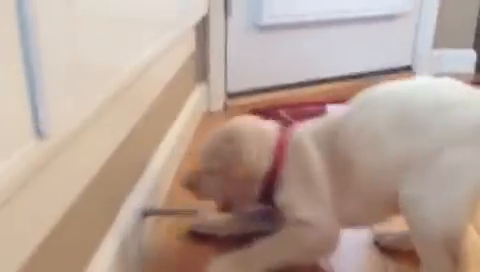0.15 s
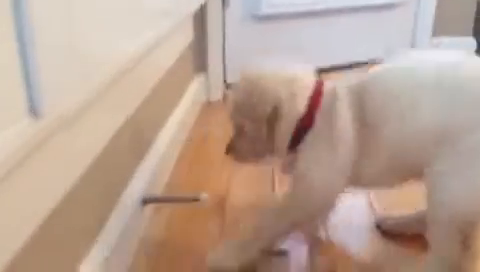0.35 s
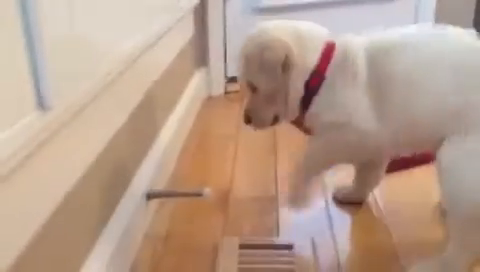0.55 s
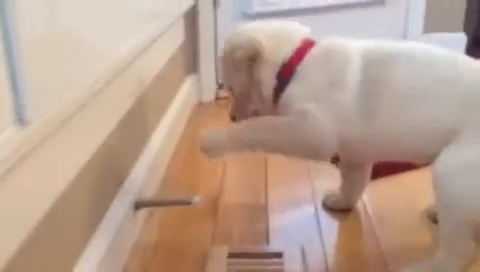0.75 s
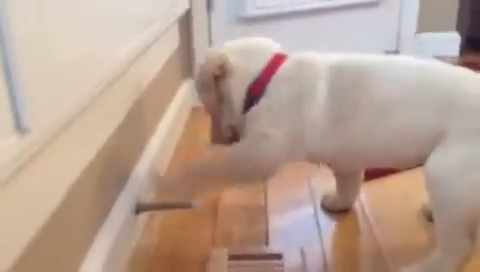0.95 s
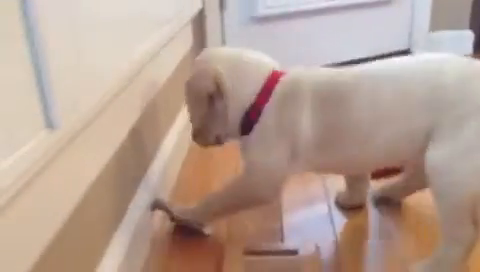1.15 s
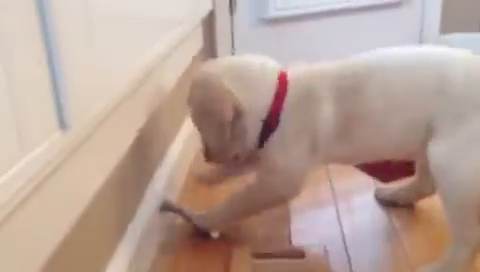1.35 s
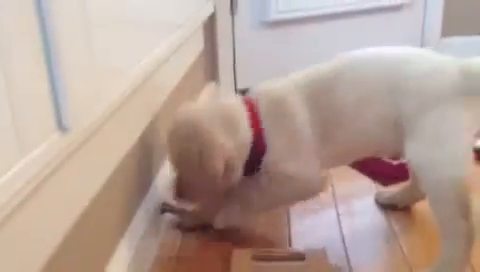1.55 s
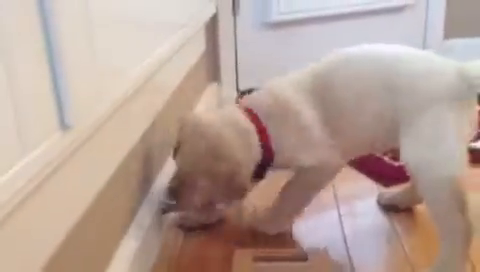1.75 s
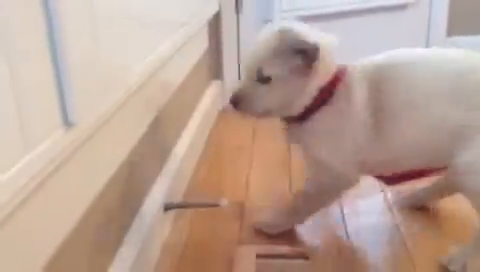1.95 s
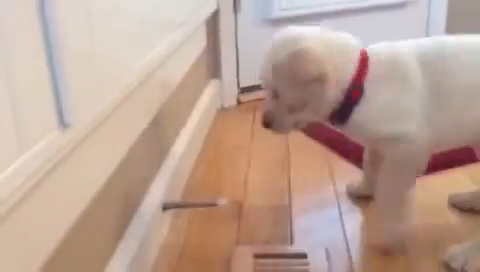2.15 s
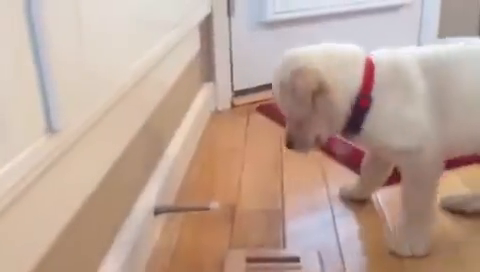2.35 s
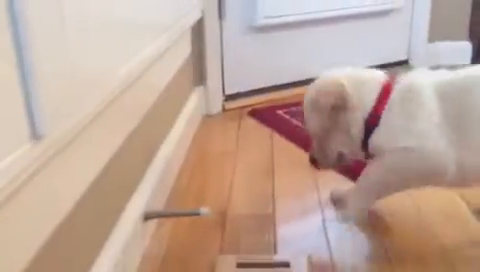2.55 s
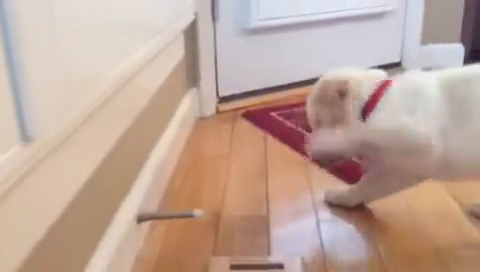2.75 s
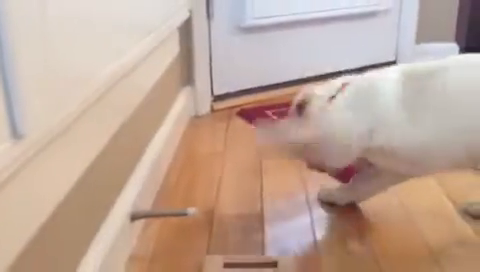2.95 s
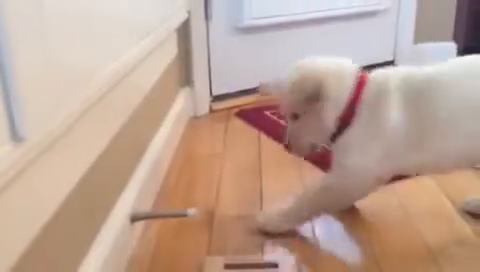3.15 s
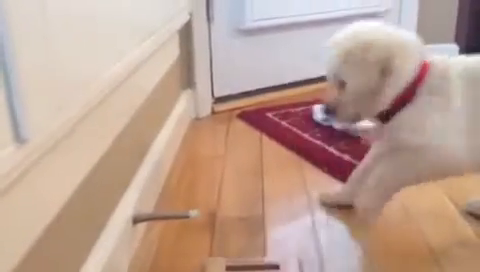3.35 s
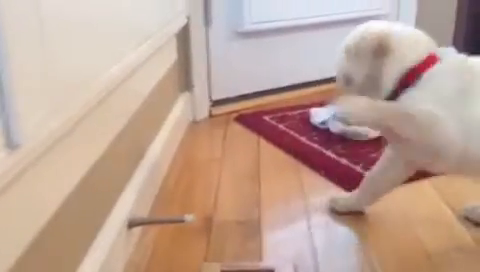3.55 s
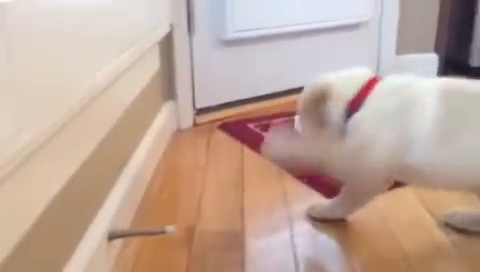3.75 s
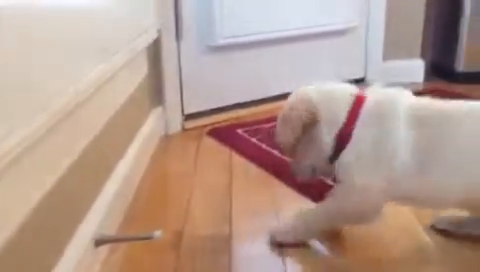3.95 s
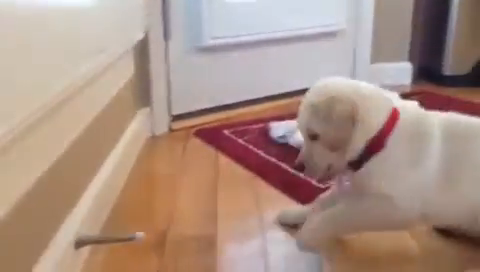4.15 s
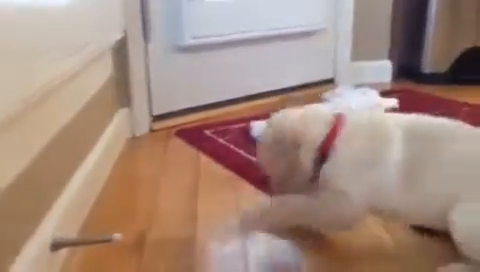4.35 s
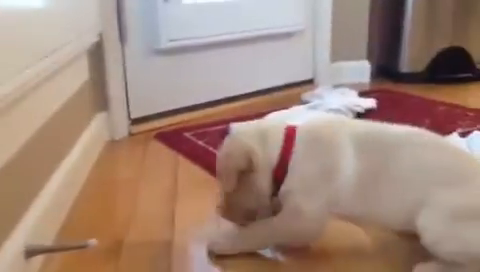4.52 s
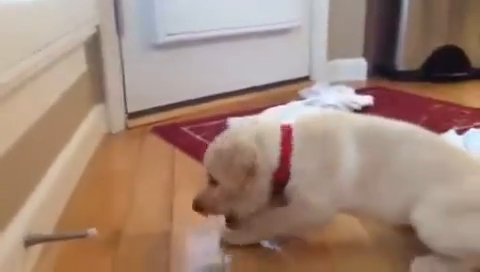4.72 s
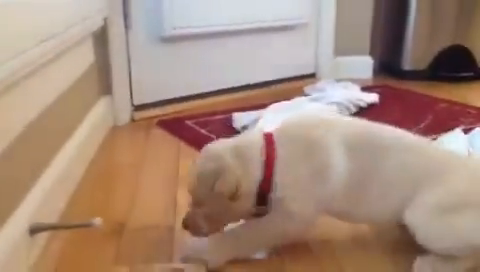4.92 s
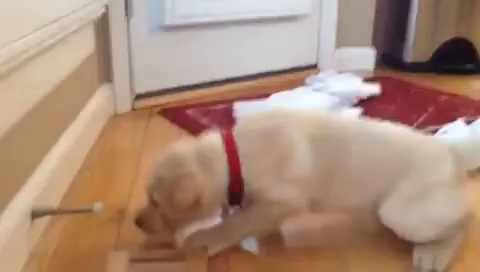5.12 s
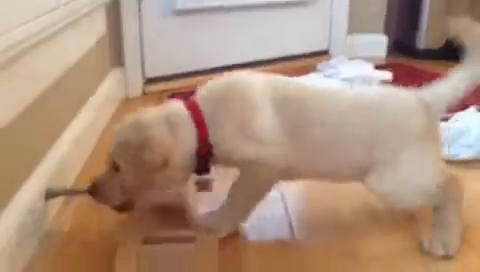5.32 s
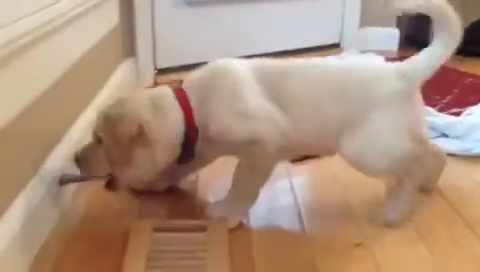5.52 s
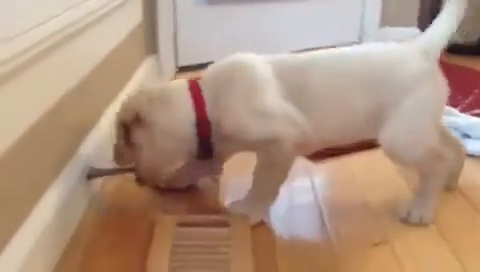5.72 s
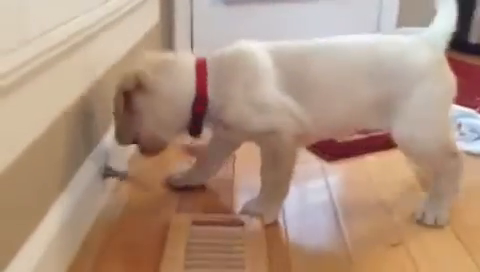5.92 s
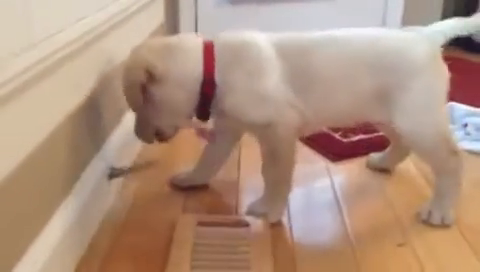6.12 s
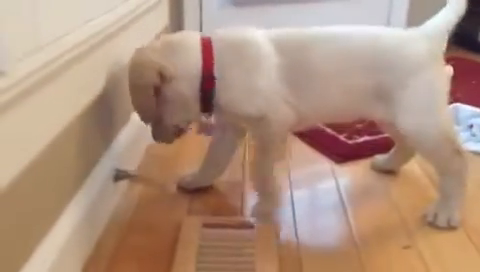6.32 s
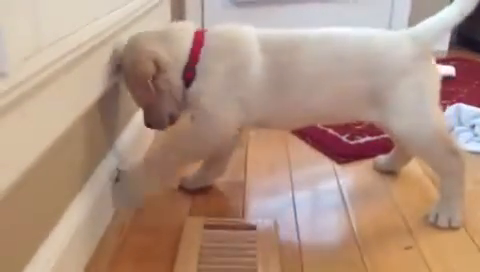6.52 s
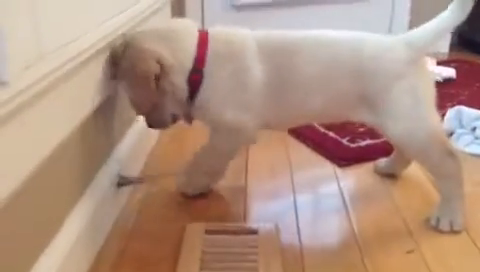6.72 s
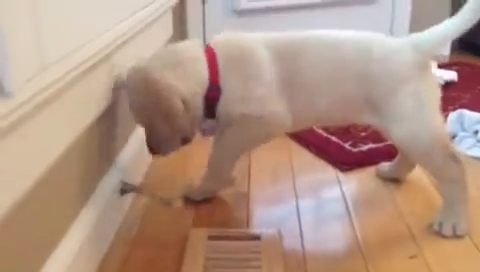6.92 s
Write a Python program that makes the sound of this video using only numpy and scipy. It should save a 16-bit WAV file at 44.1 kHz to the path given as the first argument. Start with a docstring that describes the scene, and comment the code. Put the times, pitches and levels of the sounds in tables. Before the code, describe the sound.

A puppy's paw slaps a coil-spring door stopper with a hard hollow knock, then later sets it clattering in a fast metallic, woody rattle.

```python
"""A paw lands, a floor vent clacks and a coil-spring door stopper flutters lightly over an appliance's hum.
A puppy in a small hall with a wooden floor then slaps the stopper down, bites it and sets it swinging:
the coils clap shut at each turn and shake the skirting board. Paws thud, claws tick and scuff, a tag jingles.
Impacts are sums of damped resonances, friction is granular noise, dispersion smears the metallic blows,
and the hum is a set of wavering sines over coloured noise; echoes and a decaying tail form the hall."""
import sys
import numpy as np
from scipy import signal
from scipy.fft import rfft, irfft
from scipy.io import wavfile
from scipy.ndimage import uniform_filter1d

SR = 44100
rng = np.random.default_rng(int(sys.argv[2]) if len(sys.argv) > 2 else 0)


def transcribe(u):
    """Save the signal u as a 16-bit wav file named by the first command-line argument.

    u: samples, shape (n,) or (channels, n), limited to [-1, 1]; the rate is SR.
    q: integer samples, one column per channel.
    """
    v = np.clip(np.atleast_2d(u).T, -1, 1)
    q = np.round(v * 32767).astype(np.int16)
    wavfile.write(sys.argv[1], SR, q)


N = 307818

# In all tables of resonances and spectra, levels are relative: the responses are normalised afterwards.
# Coil claps, a flutter, a bite and two swings: [t/s, coil level/dB, mounting cup level/dB, board level/dB,
# wire boom level/dB, coil brightness/(dB/octave), initial twang f/Hz, twang level/dB]
CLAPS = [(0.003, -49, -52, -42, -34, 3, 1010, -52), (0.1106, -48.5, -50, -49, -41, 2.5, 1030, -54),
         (0.2375, -45.5, -55, -35.5, -55, -10, 2370, -53), (0.2604, -49, -51, -57, -61, 2, 3060, -54),
         (0.2905, -45, -48, -36.5, -55, -22, 2360, -42), (0.3056, -47.5, -58, -39.5, -52, 2, 3200, -48),
         (0.331, -47, -51, -55, -50, -7, 3250, -44), (0.37, -55, -61, -48, -56, -7, 1220, -60),
         (0.392, -55, -60, -48, -58, 0, 3100, -58), (0.412, -58, -60, -48.5, -57.5, -2, 3000, -61),
         (0.4572, -53, -52, -43, -60, -10, 880, -51), (1.6936, -28.5, -30.5, -38, -28, -1.5, 1530, -37),
         (1.7037, -43, -27.5, -31.5, -36.5, -6, 902, -29), (1.7142, -31, -35, -28.5, -31, -4, 863, -36),
         (1.7452, -36, -33.5, -28.5, -29, -6, 890, -36), (1.7662, -40, -46, -35, -30, -5, 3320, -39),
         (1.789, -51, -50, -38, -46, -4, 900, -50), (5.984, -24.5, -22, -34.5, -25, -7.5, 1823, -23.5),
         (6.0278, -28, -22, -21.5, -25, -1.5, 1062, -27.5), (6.0677, -26, -30, -23, -27.5, -6, 1790, -30.5),
         (6.1097, -24, -30.5, -25.5, -25, -3, 3060, -36), (6.1485, -28, -30.5, -26, -23.5, -2, 3000, -31),
         (6.1908, -22.5, -31, -24, -29, -4.5, 2360, -24.5),
         (6.2286, -28.5, -30, -24.5, -24.5, -5, 1730, -36), (6.2709, -26, -29.5, -22.5, -29, -3, 2070, -31),
         (6.3066, -26.5, -29.5, -23, -25.5, -3.5, 877, -27.5),
         (6.3475, -22.5, -24.5, -20, -27, -2.5, 1140, -31), (6.3836, -22.5, -29, -23, -32, -3.5, 3350, -28),
         (6.4237, -27, -30.5, -25.5, -28.5, -3.5, 1180, -31),
         (6.4593, -25, -29, -24, -27, -3.5, 896, -27.5), (6.4988, -23, -25.5, -23, -27, -3, 1185, -30),
         (6.5326, -32.5, -42, -34.5, -39, -4, 1820, -32.5), (6.5731, -27, -25, -23.5, -34, -1.5, 1380, -33),
         (6.6079, -31.5, -32.5, -42, -52, -9, 2270, -32.5),
         (6.8184, -29, -30, -36, -27.5, -1.5, 877, -34.5),
         (6.8615, -29.5, -32.5, -38, -40, -5.5, 3020, -41), (6.8998, -28.5, -31, -30.5, -25, -1, 1320, -35),
         (6.9434, -25.5, -32.5, -40, -31, -1.5, 2370, -31)]
# Resonances colouring the coil claps: [f/Hz, width/Hz, level/dB]
COIL_RESONANCES = [(2012, 105, -6.5), (2547, 98, 0), (2815, 170, 2.5), (2970, 140, 4), (3230, 230, -3),
                   (3720, 320, -2.5), (4220, 133, -4), (4930, 290, -5.5), (5670, 270, -11.5),
                   (6130, 740, -17.5), (7470, 270, -12), (8550, 160, -14.5), (10800, 8400, -25.5),
                   (14300, 500, -31)]
# Modes of the mounting cup: [f/Hz, width/Hz, level/dB]
CUP_MODES = [(806, 65, -2), (1035, 25, 1.5), (1356, 74, 4.5), (1740, 144, 3), (1734, 204, 0.5)]
# Modes of the skirting board: [f/Hz, width/Hz, level/dB]
BOARD_MODES = [(146.2, 23, -1), (179.4, 56, -4.5), (255, 34, 0.5), (461, 34, -2), (645, 79, 2.5),
               (698, 45, -3)]
# Modes of the boom excited through the wire: [f/Hz, width/Hz, level/dB]
WIRE_MODES = [(179.5, 23, -6), (242, 19, -1), (298.4, 17, -3), (399.7, 49, 5), (428, 26, -1.5)]
# Spectrum of coils rubbing together: [f/Hz, level/dB]
RUB_COLOUR = [(40, -9), (95, -15), (140, 9), (420, 9), (800, 7), (1400, -1), (2200, -8), (2900, -6),
              (3400, -10), (4200, -5.5), (4700, -17), (6500, -19.5), (15000, -29)]
# The slap of the paw on the stopper: [t/s, level/dB, level sent to the reverberation/dB]
SLAP = (1.1145, -6.5, -17)
# Spectrum of the slap's knock: [f/Hz, level/dB]
SLAP_COLOUR = [(60, -58.5), (140, -14), (250, -10.5), (400, -25.5), (620, -7), (900, -6), (1200, 1.5),
               (1800, -3), (2150, -16), (2600, -25.5), (4000, -23), (6200, -31), (7500, -45.5),
               (15000, -61)]
# Spectrum of coils crushed under the paw: [f/Hz, level/dB]
CRUNCH_COLOUR = [(1000, -10), (2400, -1.5), (3600, 2.5), (6200, -10), (7500, -17.5), (15000, -32.5)]
# Spectrum of the pinned coils shivering: [f/Hz, level/dB]
SHIVER_COLOUR = [(400, -19), (900, -3), (1400, 2.5), (2200, 0), (2700, -10), (5000, -24.5), (8000, -39.5),
                 (15000, -55)]
# Modes of the stopper ringing on after the slap: [f/Hz, width/Hz, level/dB]
SLAP_MODES = [(652, 9, -6.5), (840, 14, -5), (1010, 11, -3), (1146, 6.3, -5), (1250, 9, 0), (1341, 6.1, 2),
              (1373, 3.7, -3), (1506, 7.1, -2), (1713, 6.6, -7), (1790, 4.4, -8.5), (1901, 6.8, -7),
              (1986, 9, 1.5), (2070, 4, -9), (2120, 5.2, -11), (2230, 7, -7), (2299, 3.6, -11.5)]
# Footfalls: [pad t/s, relative pad level/dB, pad brightness/(dB/octave), relative claw level/dB]
STEPS = [(0.001, -36.5, 1, -42), (0.026, -37.5, 4, -66), (0.496, -44, 0.5, -61), (0.545, -43, -3, -65),
         (0.638, -43.5, -3, -50.5), (1.75, -36.5, 5.5, -58), (1.969, -50.5, 4.5, -59),
         (2.103, -42.5, 2, -40), (2.447, -45, 2.5, -53.5), (3.132, -29.5, 1, -30.5),
         (3.9414, -29, -2, -37.5), (4.507, -44, -6.5, -46), (4.75, -45.5, 2, -42.5),
         (5.671, -45.5, 1.5, -71.5), (5.965, -33, 1, -48)]
# Claws alone tapping the wood: [t/s, relative level/dB, brightness/(dB/octave)]
TAPS = [(0.351, -58, 3), (0.505, -50, 1), (1.081, -42, -6), (1.267, -45, -5), (1.288, -52, -5),
        (1.349, -52, 0), (1.518, -46, -6), (1.833, -46, -4), (1.839, -43, -2), (2.303, -38.5, 0.5),
        (3.137, -33, 2), (3.164, -38.5, 2.5), (3.2775, -44.5, 0), (3.3446, -44.5, 3.5), (4.7041, -42.5, 5),
        (4.9041, -49, 3), (4.9903, -40, 4), (5.4447, -47.5, -2.5), (5.864, -46.5, -9), (5.903, -51.5, -11)]
# Modes of the floorboards: [f/Hz, width/Hz, level/dB]
FLOOR_MODES = [(129, 44, -5.5), (164, 25.6, 3.5), (248, 78, -15.5), (325.7, 23, -5), (476, 25, -38),
               (592, 39, -24.5), (819, 45, -16)]
# Resonances colouring the claw ticks: [f/Hz, width/Hz, level/dB]
CLAW_RESONANCES = [(417, 180, -5.5), (850, 100, 0), (1236, 390, -3), (1720, 147, 2), (2130, 310, -0.5),
                   (2925, 330, 3.5), (3670, 370, -1), (4335, 390, 0.5), (5100, 400, -7.5), (5760, 300, -10),
                   (7000, 1000, -12.5), (10990, 5550, -20.5)]
# Pads and fur sliding on the floor: [t/s, length/s, relative level/dB, brightness/(dB/octave)]
SCUFFS = [(0.0, 0.04, -43.5, -3), (0.08, 0.08, -63.5, -10.5), (0.246, 0.44, -56, -2),
          (0.483, 0.046, -47.5, -1), (1.694, 0.12, -48.5, 0), (1.867, 0.56, -60.5, 1),
          (3.263, 0.095, -54, 1.5), (4.102, 0.075, -60.5, 4.5), (4.691, 0.1, -55, 2),
          (4.979, 0.056, -54, 1), (5.568, 0.44, -64, -1.5)]
# Spectrum of the sliding friction: [f/Hz, level/dB]
SCUFF_COLOUR = [(50, -32), (120, -4), (250, 5), (500, 1.5), (900, -1.5), (1300, -8), (3000, -7),
                (5000, -10.5), (7000, -22.5), (15000, -39)]
# A claw dragged over the boards: [t/s, length/s, level/dB]
SCRAPES = [(2.092, 0.013, -63), (3.28, 0.097, -58.5)]
# Resonances colouring the dragged claw: [f/Hz, width/Hz, level/dB]
SCRAPE_RESONANCES = [(2360, 300, -1), (2970, 300, 4), (4290, 860, 4), (5160, 410, -18)]
# Collar tag striking its ring: [t/s, level/dB, brightness/(dB/octave)]
JINGLES = [(1.428, -59.5, 4), (1.4531, -55, -1), (2.026, -40.5, 2), (2.0453, -54, 9), (2.057, -46, 3),
           (2.0776, -43.5, -6), (2.128, -44, -5), (2.175, -49, 9), (2.19, -49, 4), (2.251, -34, -1),
           (2.259, -46, 0)]
# Modes of the tag: [f/Hz, width/Hz, level/dB]
TAG_MODES = [(5250, 74, -13), (6700, 34, 1), (6850, 30, -2), (6900, 47, -6), (8050, 45, -2), (8230, 26, 0),
             (8440, 56, -14), (11000, 250, -15), (12400, 100, -6.5), (14453, 60, -7), (14700, 70, -5)]
# Spectrum of the tag's tick: [f/Hz, level/dB]
TICK_COLOUR = [(1000, -26.5), (4500, -18.0), (7200, 2), (9500, -16.0), (12500, -14), (15000, -9)]
# A paw knocking the grille of a floor vent: [t/s, level/dB]
VENT_KNOCKS = [(0.012, -41), (0.489, -40), (4.974, -48)]
# Modes of the grille: [f/Hz, width/Hz, level/dB]
VENT_MODES = [(848, 37, 10), (910, 40, 0.5), (1175, 44, -4), (1340, 36, -11.5), (2670, 110, -21),
              (3624, 50, -14)]
# Appliance tones, about which pitch and level waver: [f/Hz, rms level/dB]
HUM = [(153, -73), (172.3, -61.5), (204.8, -63.5), (236.9, -69.5), (411, -90), (473.7, -81.5), (613.7, -83)]
# Spectral density of the still air: [f/Hz, level/dB]
AIR = [(18, -70), (30, -42), (65, -28), (102, -19.5), (136, -6.5), (154, -1.5), (171, -6.5), (247, -1),
       (267, -11), (629, -19), (698, -24), (1410, -25), (2190, -28), (13500, -31.5), (15000, -46)]
# Wall and floor echoes: [delay t/s, level/dB]
ECHOES = [(.0033, -19.5), (.0098, -22), (0.0145, -34.5)]
# Reverberation time of the hall: [f/Hz, t60/s]
HALL_T60 = [(150, 0.25), (500, .45), (1500, 0.46), (4000, 0.49), (12000, 0.42)]
# Spectrum of the hall's tail: [f/Hz, level/dB]
HALL_COLOUR = [(150, -1.5), (450, 4.5), (800, 0.5), (1400, -5.5), (2200, -1.5), (2900, -3.5), (4200, -4),
               (6000, -5), (15000, -7)]

WIRE_LAG_S = 0.00891  # the slow bending wave returns along the wire this long after each clap
TWANG_RISE_S, TWANG_DECAY_S, TWANG_FALL_OCT_PER_S = 0.00046, 0.0053, 22.3
RUB_DB, RUB_RISE_S, RUB_DECAY_S = -18.5, 0.015, 0.064  # level relative to the coil level of the clap
SHIVER_DB, SHIVER_PER_S, SHIVER_DECAY_S = -25.5, 500, 0.098  # level relative to the slap
CLAW_LEAD_S, CLAW_BRIGHT_DB = 0.0068, 0.5  # brightness in dB per octave
AIR_DB = -61  # rms
TOP_HZ = 15700
SIZE = 32768  # samples in one response
HZ = np.maximum(np.fft.rfftfreq(SIZE, 1 / SR), 1)
AGE = np.arange(SIZE) / SR  # seconds since contact


def spring():
    """Impact and modal excitation: each clap twangs, rings cup and board, and booms the wire a moment later."""
    out = np.zeros(N)
    travel = bending(lag_s=0.000785)
    panel = radiation(low_hz=123.0, high_hz=1520) * bending(lag_s=0.0003)
    rebound = np.exp(-2j * np.pi * HZ * WIRE_LAG_S)
    # the same turns meet whenever the spring swings to the same side, so alternate claps sound alike
    turns = [chatter(length_s=0.0024) for _ in range(2)]
    for k, (s, coil_db, cup_db, board_db, wire_db, bright, twang_hz, twang_db) in enumerate(CLAPS):
        # each clap weights and detunes the resonances a little at random
        coil = unit(ringing(COIL_RESONANCES, scatter_db=3, detune=.009) * tilt(bright, 3850))
        cup = ringing(CUP_MODES, scatter_db=2.5, detune=.018)
        board = unit(ringing(BOARD_MODES, scatter_db=2.5, detune=.015) * panel)
        wire = unit(ringing(WIRE_MODES, scatter_db=2.5, detune=.02) * panel)
        contact = amp(-1.5) * travel + amp(-8) * turns[k % 2] + amp(-8) * chatter(length_s=0.003)
        metal = contact * (amp(coil_db) * coil + amp(cup_db) * cup)
        metal = metal + amp(twang_db) * twang(twang_hz)
        wood = amp(board_db) * board + amp(wire_db) * wire * rebound
        add(out, s, metal + wood)
    return out + rubbing(CLAPS)


def twang(hz):
    """Dispersion: where the coils meet sets the free spring's pitch, which falls as slower waves arrive."""
    pitch = hz * 2 ** (-TWANG_FALL_OCT_PER_S * AGE)
    phase = 2 * np.pi * np.cumsum(pitch) / SR
    envelope = (1 - np.exp(-AGE / TWANG_RISE_S)) * np.exp(-AGE / TWANG_DECAY_S)
    return unit(rfft(envelope * np.sin(phase)))


def rubbing(claps):
    """Dry friction: the coils grind just before each clap and go on rubbing as they reopen."""
    t, power = np.arange(N) / SR, 0
    for s, db, *_ in claps:
        rise = np.clip(1 + (t - s) / RUB_RISE_S, 0, 1)
        decay = np.exp(-np.clip((t - s) / RUB_DECAY_S, 0, 20))
        power = power + (amp(db + RUB_DB) * rise * decay) ** 2
    return np.sqrt(power) * grains(RUB_COLOUR, spread_db=4.0, grip_db=6.0)


def slap():
    """Compact impact: one hard, hollow knock under the paw; the coils crunch, rebound, shiver and ring on."""
    out, hit = np.zeros(N), knock(SLAP_COLOUR)
    s, db, _ = SLAP
    add(out, s, amp(db) * hit * bending(lag_s=0.00096))
    add(out, s, amp(db - 21.5) * knock(CRUNCH_COLOUR) * chatter(length_s=0.004))
    add(out, s + 0.0026, amp(db - 15) * hit * chatter(length_s=0.004))  # rebound
    add(out, s, amp(db + SHIVER_DB) * knock(SHIVER_COLOUR) * shiver())
    add(out, s, amp(db - 15) * ringing(SLAP_MODES))
    return out


def shiver():
    """Random impacts with dispersion: a dying run of light coil contacts, each smeared into a tiny chirp."""
    contacts = rng.uniform(-0.91, 1, SIZE) * (rng.random(SIZE) < SHIVER_PER_S / SR)
    contacts = contacts * (1 - np.exp(-AGE / .012)) * np.exp(-AGE / SHIVER_DECAY_S)
    return rfft(contacts / np.linalg.norm(contacts)) * bending(lag_s=0.0037)


def paws():
    """Contact hardness: soft pads boom the floorboards, hard claws tick on them just before."""
    out = np.zeros(N)
    floor = ringing(FLOOR_MODES) * radiation(low_hz=108.0, high_hz=1140)
    claw = ringing(CLAW_RESONANCES)
    for s, db, bright, _ in STEPS:
        add(out, s, amp(db + 5.0) * floor * tilt(bright, 212))
    landings = [(s - CLAW_LEAD_S, db, CLAW_BRIGHT_DB) for s, _, _, db in STEPS]
    for s, db, bright in landings + TAPS:
        add(out, s, amp(db - 4.5) * claw * tilt(bright, 3000) * chatter(length_s=0.0048))
    return out


def scuffs():
    """Stick-slip friction: sliding pads and fur give dense, uneven grains of noise."""
    out, slide = np.zeros(N), grains(SCUFF_COLOUR, spread_db=5.5, grip_db=3.0)
    for s, length, db, bright in SCUFFS:
        envelope = np.interp(AGE, [0, 0.12 * length, length], [0, 1, 0])
        stroke = envelope * np.roll(slide, -int(s * SR))[:SIZE]
        add(out, s, amp(db - 3.0) * rfft(stroke) * tilt(bright, 1300))
    return out


def scrapes():
    """Sparse stick-slip: a dragged claw catches on the wood in a gritty run of tiny clicks."""
    out, claw = np.zeros(N), ringing(SCRAPE_RESONANCES)
    for s, length, db in SCRAPES:
        catches = rng.standard_normal(SIZE) * (rng.random(SIZE) < 400 / SR)  # 400 per second
        envelope = np.interp(AGE, [0, 0.76 * length, length], [1, .8, 0])
        add(out, s, amp(db) * claw * rfft(catches * envelope))
    return out


def tag():
    """Plate modes: a small metal plate ticks and rings thinly, a little differently at each strike."""
    out, tick = np.zeros(N), knock(TICK_COLOUR)
    for s, db, bright in JINGLES:
        plate = ringing(TAG_MODES, scatter_db=5, detune=.001)
        strike = amp(-1.5) * plate + amp(-5) * tick * chatter(length_s=0.004)
        add(out, s, amp(db) * tilt(bright, 8200) * strike)
    return out


def vent():
    """Modal excitation by a burst of contacts: the grille gives a short, pitched clack."""
    out, grille = np.zeros(N), ringing(VENT_MODES)
    for s, db in VENT_KNOCKS:
        add(out, s, amp(db) * grille * chatter(length_s=0.0051))
    return out


def background():
    """Sum of slowly wavering tones: the appliance's motor hums over faint coloured noise."""
    hum = 0
    for hz, db in HUM:
        phase = 2 * np.pi * np.cumsum(hz + .7 * walk(8)) / SR
        hum = hum + amp(db + 0.85 * walk(3.1)) * np.sqrt(2) * np.sin(phase)
    return hum + amp(AIR_DB) * coloured(rng.standard_normal(N), AIR)


def reverberation(x):
    """Diffuse decay: noise bands die exponentially, each with its own reverberation time."""
    noise, tail = rfft(rng.standard_normal(SIZE)), 0
    for k, (hz, t60) in enumerate(HALL_T60):
        # overlapping bands whose shares sum to one
        share = along([(f, float(j == k)) for j, (f, _) in enumerate(HALL_T60)], HZ)
        tail = tail + irfft(noise * share) * np.exp(-np.log(1000) * AGE / t60)
    tail = coloured(tail * (1 - np.exp(-AGE / 0.0014)), HALL_COLOUR)
    return signal.fftconvolve(x, tail * amp(-2.0) / np.sqrt(SIZE))[:N]


def ringing(modes, scatter_db=0, detune=0):
    """Modal superposition: damped resonances add up, each weighted and shifted a little at random."""
    chance = rng.standard_normal((len(modes), 2))
    response = 0
    for k, ((hz, width, db), (weight, shift)) in enumerate(zip(modes, chance)):
        hz = hz * (1 + detune * shift)
        resonance = 1 / (1 + 1j * (HZ - hz * hz / HZ) / width)
        response = response + (-1) ** k * amp(db + scatter_db * weight) * resonance  # alternating signs
    return unit(response)


def knock(colour):
    """Minimum phase: the most compact causal response with a given spectrum."""
    cepstrum = irfft(np.log(amp(along(colour, HZ))))
    # fold the cepstrum onto positive time
    cepstrum[1:SIZE // 2] *= 2
    cepstrum[SIZE // 2 + 1:] = 0
    return unit(np.exp(rfft(cepstrum)))


def tilt(db_per_octave, pivot_hz):
    """Contact stiffness: harder contacts are brighter; the slope spans two octaves each side of the pivot."""
    return amp(db_per_octave * np.clip(np.log2(HZ / pivot_hz), -2, 2))


def bending(lag_s):
    """Bending-wave dispersion: treble travels ahead of bass; lag_s is the travel time at 1 kHz."""
    return np.exp(-4j * np.pi * lag_s * np.sqrt(1000 * HZ))


def radiation(low_hz, high_hz):
    """Radiation efficiency: a wooden panel radiates only a middle band."""
    return 1 / (1 + (low_hz / HZ) ** 14) / (1 + (HZ / high_hz) ** 4)


def chatter(length_s):
    """Multiple impact: spectrum of a quick swarm of tiny contacts, normalised to unit energy."""
    envelope = AGE * np.exp(-2 * AGE / length_s)
    swarm = rng.standard_normal(SIZE) ** 3 * envelope  # cubing leaves a few strong contacts
    return rfft(swarm / np.linalg.norm(swarm))


def grains(colour, spread_db, grip_db):
    """Stick-slip friction: dense tiny contacts whose strength comes and goes."""
    size = np.minimum(rng.exponential(size=N), 4)
    grip = np.clip(walk(160), -2, 2)
    contacts = rng.standard_normal(N) * amp(spread_db * size + grip_db * grip)
    return coloured(contacts, colour)


def coloured(x, colour):
    """Linear filtering: shape a signal by a spectrum and scale it to an rms of 1."""
    gain = amp(along(colour, np.fft.rfftfreq(len(x), 1 / SR)))
    y = irfft(rfft(x) * gain, len(x))
    return y / np.std(y)


def walk(rate):
    """Random modulation: smoothed chance values, rate per second, with a spread near 1."""
    k = int(SR / rate)
    return uniform_filter1d(np.repeat(rng.standard_normal(N // k + 1), k), k)[:N]


def amp(db):
    """Logarithmic level: decibels to amplitude gain."""
    return 10 ** (np.asarray(db) / 20)


def along(points, hz):
    """Logarithmic frequency scale: interpolate (f/Hz, value) points."""
    f, value = np.transpose(points)
    return np.interp(np.log(np.maximum(hz, 1)), np.log(f), value)


def unit(response):
    """Energy normalisation: scale a response to one millisecond at full level."""
    return response * np.sqrt(SR / 1000 / np.mean(np.abs(response) ** 2))


def add(track, s, response):
    """Superposition: place one blow, given by its spectrum, at time s."""
    lead = 128  # samples kept ahead of the blow
    sound = np.roll(irfft(response), lead)[:SIZE * 3 // 4]
    at = int(s * SR) - lead + np.arange(len(sound))
    inside = (at >= 0) & (at < N)
    track[at[inside]] += sound[inside]


def scene():
    """Direct and reflected sound: stopper and puppy with near echoes, the hall's tail and the background."""
    stopper, blow, feet = spring(), slap(), paws()
    small = scuffs() + scrapes() + tag() + vent()
    direct = stopper + blow + feet + small
    echoes = sum(amp(db) * np.pad(direct, (int(s * SR), 0))[:N] for s, db in ECHOES)
    sent = amp(-16.5) * stopper + amp(SLAP[2]) * blow + amp(-7.0) * feet + amp(-7.0) * small
    return (direct + echoes + reverberation(sent) + background())[None]


def record(dry):
    """Band limitation: a steep elliptic low-pass filter removes the highest treble."""
    return signal.sosfilt(signal.ellip(10, .2, 70, TOP_HZ, fs=SR, output="sos"), dry)


dry = scene()
out = record(dry)
transcribe(out)
```